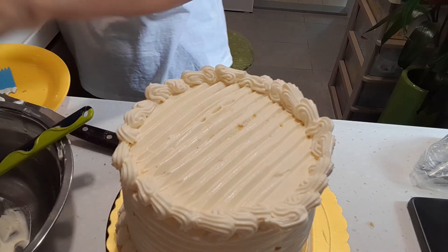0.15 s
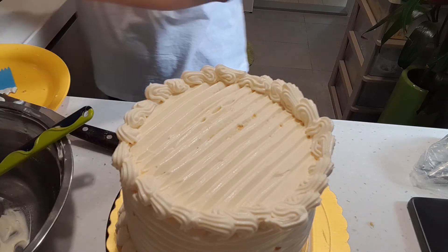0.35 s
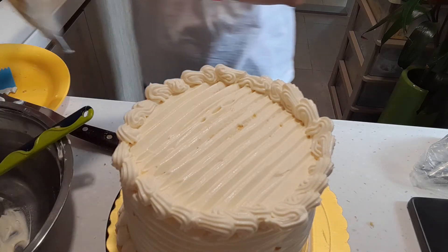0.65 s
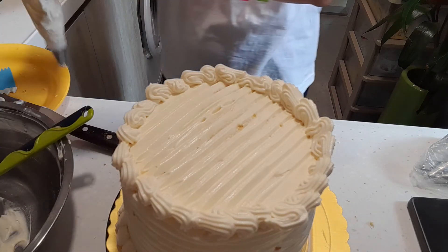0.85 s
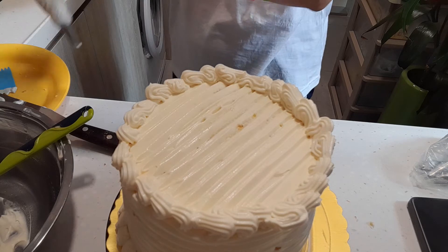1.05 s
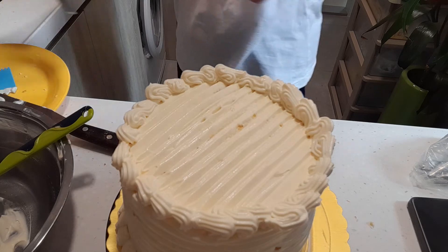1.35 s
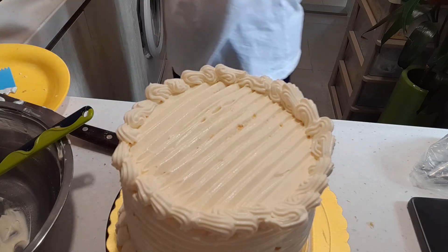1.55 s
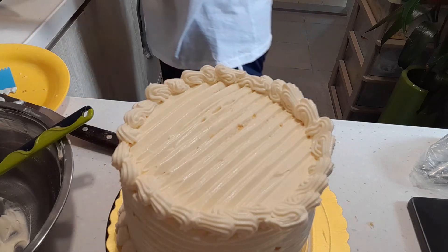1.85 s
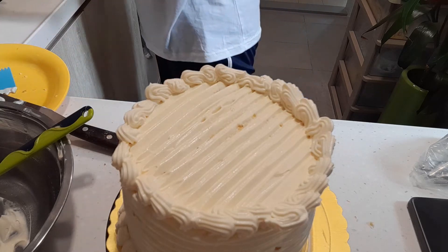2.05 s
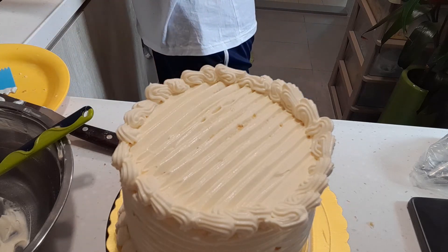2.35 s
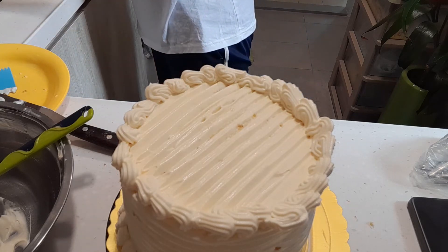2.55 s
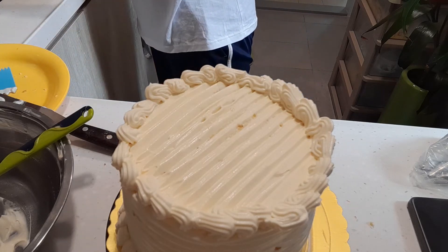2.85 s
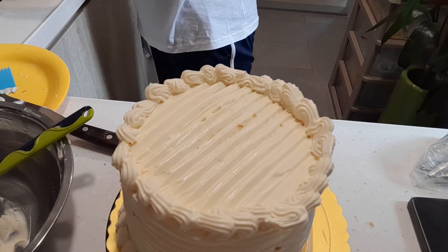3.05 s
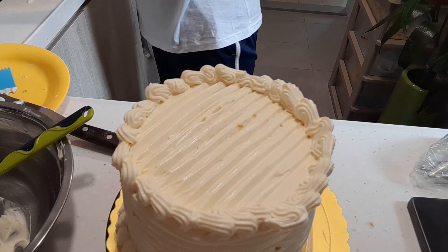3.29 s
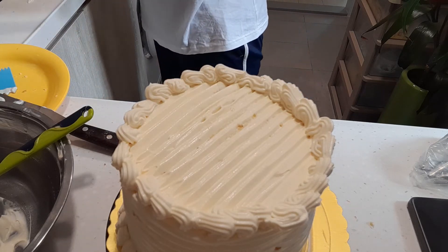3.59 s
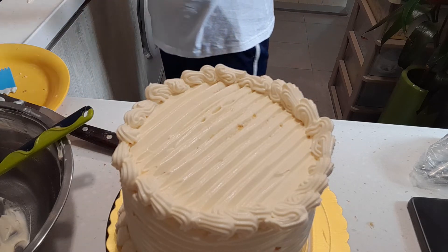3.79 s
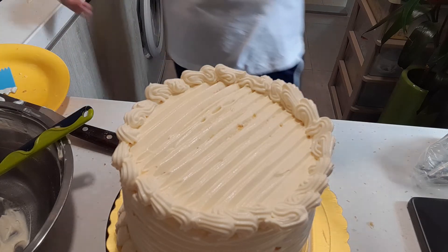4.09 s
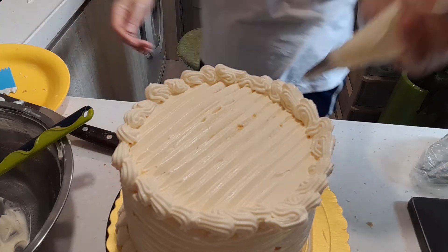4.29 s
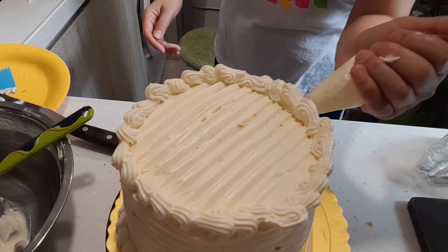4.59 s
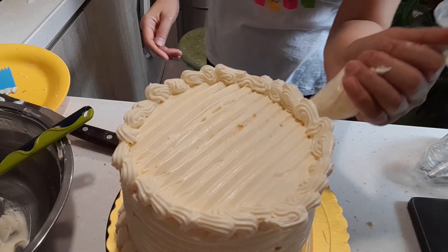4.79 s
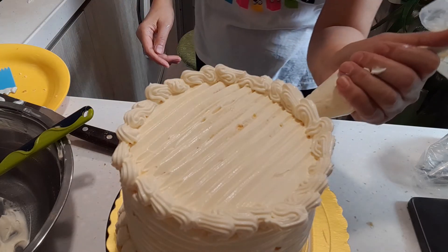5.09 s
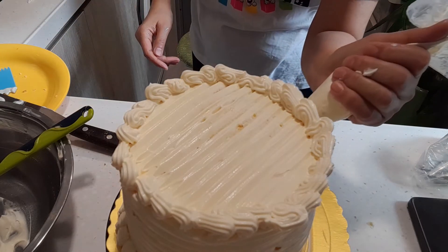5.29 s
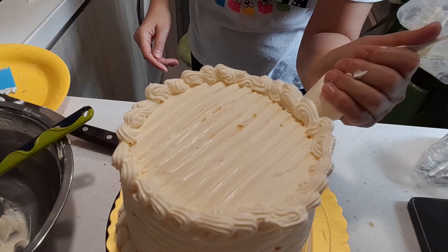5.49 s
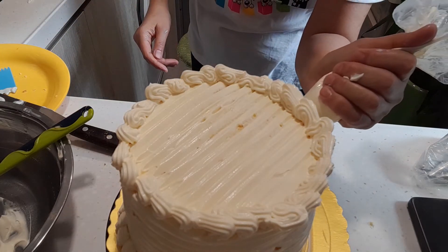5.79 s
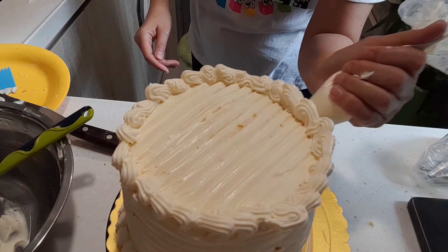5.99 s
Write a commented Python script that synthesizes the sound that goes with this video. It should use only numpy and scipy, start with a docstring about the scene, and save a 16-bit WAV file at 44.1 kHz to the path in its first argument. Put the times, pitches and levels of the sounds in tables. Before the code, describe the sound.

In a small kitchen, a tool clanks once on a metal bowl, thin plastic film crinkles loudly for two seconds, then rustles ever more faintly.

```python
"""In a kitchen a tool knocks on a steel bowl, then a thin plastic bag is twisted, filled and squeezed.
The bag is clumped filtered clicks plus single snaps, each a noise tick with a short ring.
It sounds first to the left, then near the front and last to the right of two spaced microphones.
The knock is a noise crack and a sum of decaying modes; random tap echoes form the room.
A low appliance hum and a faint hiss are diffuse noise."""
import sys
import numpy as np
from scipy import signal
from scipy.io import wavfile
from scipy.ndimage import uniform_filter1d, map_coordinates

SR = 44100
rng = np.random.default_rng(int(sys.argv[2]) if len(sys.argv) > 2 else 0)


def unload_audio(sound):
    """Save the sound as a 16-bit wav file, at the path given as the first command line argument."""
    columns = np.transpose(np.atleast_2d(sound))
    # keep every value between -1 and 1, then stretch to whole-number steps
    steps = np.round(np.clip(columns, -1, 1) * 32767)
    wavfile.write(sys.argv[1], SR, steps.astype(np.int16))


N = 270757

# moves of the hands on the bag: peak t/s, swell/s, hold/s, crackle level/dB before later gains,
# dull crease level/dB above the crackle
GRIPS = [(.17, .05, 0, -59.5, 4.5), (0.252, .005, 0.0029, -34.5, -17), (0.398, 0.11, 0, -29.5, -15),
         (0.549, 0.32, 0.0093, -29.5, -15), (0.659, 0.011, 0, -31.5, -13.5), (0.76, 0.13, 0.0077, -22, -20),
         (0.907, 0.037, 0.049, -37, -17.5), (1.028, 0.18, 0, -28, -25.5), (1.21, 0.067, 0.0019, -28, -28),
         (1.279, 0.029, 0.07, -27, -19), (1.413, 0.16, 0.33, -34, -20.5),
         (1.949, 0.17, 0.023, -33.5, -17.5), (2.101, .03, 0, -33.5, -12), (2.179, .15, 0, -35, -16.5),
         (2.318, 0.12, 0, -27.5, -20), (2.466, 0.45, 0.028, -37.5, -11.5), (2.716, .3, 0.012, -50, -6),
         (2.849, 0.19, 0, -48, -8.5), (2.958, 0.11, 0, -43.5, -15.5), (3.13, 0.089, 0, -41, -9.5),
         (3.176, .1, 0, -52.5, -1), (3.275, 0.13, 0.021, -49.5, 1), (3.377, .1, 0, -55.5, 3.5),
         (3.474, 0.19, 0.022, -45.5, -5), (3.58, .1, .08, -62, -3), (3.768, 0.11, 0.017, -56, -4),
         (3.833, .03, 0.038, -54.5, -3.5), (4.046, 0.037, .03, -59.5, -2.5),
         (4.125, .03, 0.0033, -54, -1.5), (4.229, .08, 0.005, -49, -4), (4.3, .1, 0.18, -60, -2),
         (4.612, 0.15, 0.042, -59.5, -0.5), (4.768, .04, 0.036, -58.5, -6), (4.845, .03, .03, -64, 0),
         (4.93, 0.021, 0, -50.5, -12), (5.01, 0.012, 0, -56, -1), (4.97, .04, 0, -59, 2),
         (5.095, .01, 0, -61.5, -15), (5.129, .02, 0, -62, -11), (5.283, .05, .04, -71.5, 3),
         (5.36, .02, 0, -69, 3), (5.48, .02, 0, -68.5, -16.5), (5.701, 0.049, 0.046, -78.5, 8),
         (5.812, .02, 0.019, -69, -10)]
# direction of the bag: t/s, lead of the left microphone/samples (negative: the right hears it first)
LEFT_LEAD = [(0, 17.5), (3.9, 16), (4.2, -3), (5.4, 3.5), (5.8, -13)]
# spectrum of loose thin film: f/Hz, relative density/dB per Hz
LOOSE_FILM = [(290, -38.5), (500, -4.5), (710, -13.5), (898, -6.5), (1280, -10.5), (2260, -2.5),
              (4970, 0.5), (6960, -2.5), (12100, 4), (14500, 2.5), (15800, -1), (16500, -37)]
# spectrum of film pulled tight over the filling: f/Hz, relative density/dB per Hz
TIGHT_FILM = [(1180, -37.5), (2000, -9), (3340, -0.5), (4550, 0), (6360, -4), (8290, -1.5), (12100, -2),
              (14600, -9), (16500, -58.5)]
FILLED_S = 3.21  # the film is tight from about here
SPACING = 19  # samples of sound travel between the microphones


def gain_of(db):
    """Level definition: decibels to amplitude gain."""
    return 10 ** (np.asarray(db) / 20)


def evened(x):
    """Normalization: scales to rms 1."""
    return x / np.sqrt(np.mean(x ** 2) + 1e-20)


def read(points, hz):
    """Interpolation of a spectrum on a logarithmic frequency axis."""
    f, value = np.transpose(points)
    return np.interp(np.log(hz + 1), np.log(f + 1), value)


def track(rows):
    """Linear interpolation of a time table at every sample."""
    t, value = np.transpose(rows)
    return np.interp(np.arange(N) / SR, t, value)


def coloured(x, points):
    """Minimum-phase filtering: the log spectrum fixes the phase, which makes the filter causal."""
    spectrum_db = read(points, abs(np.fft.fftfreq(4096, 1 / SR)))
    log_gain = np.log(gain_of(np.maximum(spectrum_db, -100)))
    taps = np.fft.ifft(np.exp(np.conj(signal.hilbert(log_gain)))).real[:2048]
    return signal.oaconvolve(np.atleast_2d(x), taps[None], axes=1)[:, :N]


def rustle():
    """Crackling noise: bright film clicks and duller creases of the full part follow the hands."""
    # creases of the full part: f/Hz, relative density/dB per Hz
    crease_spectrum = [(300, -32.5), (600, -6.5), (950, -1), (1500, 1.5), (2400, -4.5), (3500, -14.5),
                       (5500, -40)]
    t = np.arange(N) / SR
    # fades in dB/s, floors in dB for the bag held still
    level_db = handling(fade_db_per_s=159.5, still_db=-90, share_db=0)
    crease_db = handling(fade_db_per_s=135, still_db=-78, share_db=np.transpose(GRIPS)[4])
    # gentle handling clicks more sparsely and in stronger clumps
    busy = np.clip(gain_of(.6 * (level_db + 37.5)), .12, 1)
    clicks = crackle(9000 * busy, spread_db=2.0, clump_db=1.5 + 2.9 * (1 - busy))
    dull_clicks = crackle(1200 + 4000 * busy, spread_db=2.5, clump_db=2.5)

    tight = 1 / (1 + np.exp((FILLED_S - t) / 0.66))
    loose_film = evened(coloured(clicks, LOOSE_FILM)[0])
    tight_film = evened(coloured(clicks, TIGHT_FILM)[0])
    film = (1 - tight) * loose_film + tight * tight_film
    creases = evened(coloured(0.1 * evened(clicks) + evened(dull_clicks), crease_spectrum)[0])
    return gain_of(-4.6 * tight) * (gain_of(level_db) * film + gain_of(crease_db) * creases)


def handling(fade_db_per_s, still_db, share_db):
    """Power summation of the grips: each swells, holds and fades linearly in dB."""
    lifted_s, lifted_fade = 3.3, 1.64  # grips peaking after the filled bag is lifted fade faster
    t = np.arange(N // 32 + 2)[:, None] * 32 / SR
    peak, swell, hold, db = np.transpose(GRIPS)[:4]
    rise_db = np.minimum(22 * (t - peak) / np.maximum(swell, .004), 0)  # 22 dB over the swell
    fade = fade_db_per_s * np.where(peak > lifted_s, lifted_fade, 1)
    fall_db = fade * np.maximum(t - peak - abs(hold), 0)
    power = (gain_of(db + share_db + rise_db - fall_db) ** 2).sum(1)
    level_db = 10 * np.log10(power + gain_of(still_db) ** 2)
    return np.interp(np.arange(N) / SR, t[:, 0], level_db)


def crackle(per_s, spread_db, clump_db):
    """Random impulse process: clicks of uneven size in millisecond clumps, mean power free of rate."""
    clumps = evened(uniform_filter1d(rng.standard_normal(N), size=260))
    size = gain_of(spread_db * np.minimum(rng.exponential(1, N), 4) + clump_db * clumps)
    happens = rng.random(N) < per_s / SR
    return size * rng.standard_normal(N) * happens / np.sqrt(per_s)


def snaps():
    """Buckling: each crease that gives way sends a noise tick of a few milliseconds and a dull ring."""
    # the clearest snaps: t/s, bright tick peak level/dB before panning, ring level/dB above the tick, ring f/Hz
    clear_snaps = [(.166, -37, -5, 1800), (.2493, -27.5, -11, 2280), (.3511, -19, -19, 2280),
                   (.4893, -20, -9, 1560), (.6519, -18, -30, 2320), (.7093, -18, -15, 1720),
                   (1.0056, -18, -14, 840), (1.0136, -12.5, -16, 1090), (1.1194, -27, -25, 1770),
                   (1.1515, -23, -28, 2400), (1.1747, -32, -25, 2360), (1.1987, -20, -4, 2600),
                   (1.2506, -11.5, -21, 2070), (1.2965, -18.5, -5, 2200), (1.3304, -9, -14, 2270),
                   (1.8991, -34, -23, 848), (2.0991, -26, -19, 1910), (2.4379, -26, -17, 2310),
                   (2.7207, -36, -26, 923), (2.7935, -40.5, 3, 990), (2.9208, -38, -20, 890),
                   (2.9387, -32, -23, 900), (3.0754, -44, -9, 958), (3.1018, -36, -9, 1730),
                   (3.1154, -36, -6, 1630), (3.1494, -48, 8, 921), (3.1824, -36.5, 5, 905),
                   (3.2774, -37.5, 7.5, 970), (3.3717, -36, -11, 980), (3.4794, -45, 9, 956),
                   (3.5294, -46, 6, 1100), (3.7893, -40, -4, 921), (3.8417, -35, -5, 2330),
                   (4.0342, -45, -4, 1290), (4.1065, -48.5, 9, 1800), (4.1225, -36, -11, 1000),
                   (4.1630, -51, 8, 1300), (4.1724, -55, 11, 923), (4.1862, -43.5, 8.5, 1740),
                   (4.2308, -30.5, -3.5, 1260), (4.2594, -45, 2, 845), (4.2911, -41, 1, 1560),
                   (4.3364, -45.5, 7, 1070), (4.3504, -50, -3, 1000), (4.3844, -48, 4, 1040),
                   (4.4200, -43.5, -1, 1800), (4.4258, -43, -3, 826), (4.5516, -52, -15, 950),
                   (4.5664, -57, 9, 1370), (4.5774, -56, 5, 900), (4.59, -49, -5, 960),
                   (4.6074, -37, -13, 1030), (4.6184, -43.5, 2, 1400), (4.6554, -52, 7, 1170),
                   (4.7486, -52, 3, 1540), (4.7621, -50, -5, 837), (4.7845, -41, -11, 1360),
                   (4.8254, -45, -6, 890), (4.8494, -53, 8, 1150), (4.9220, -35.5, -9, 830),
                   (4.9744, -47, 0, 1180), (5.01, -37, -11, 840), (5.0274, -46, 4, 1200),
                   (5.0943, -43, -6, 1180), (5.1277, -42.5, -10, 840), (5.2694, -53, -10, 834),
                   (5.3512, -38.5, -4.5, 855), (5.4735, -49, -13, 831), (5.7244, -55, -7, 912),
                   (5.8002, -53, -20, 867), (5.8985, -53.5, -4, 915)]
    out = np.zeros((2, N + 600))
    t = np.arange(600) / SR
    envelope = np.exp(-t / 0.0017) - np.exp(-t / 0.00075)
    rows = clear_snaps + faint_snaps()
    # the nearer microphone hears a snap louder: 0.46 dB per sample of lead
    pan_db = 0.46 * track(LEFT_LEAD)
    for (s, db, ring_db, hz), burst in zip(rows, rng.standard_normal((len(rows), 600))):
        at = round(s * SR)
        tick = coloured(burst * envelope, LOOSE_FILM if s < FILLED_S else TIGHT_FILM)[0, :600]
        sound = tick / abs(tick).max() + gain_of(ring_db) * ring(hz, cycles=1.67)
        side_db = .5 * pan_db[at] * np.array([[1], [-1]])
        out[:, at:at + 600] += gain_of(db + side_db) * sound
    return out[:, :N]


def faint_snaps(count=36):
    """Random scatter: small snaps while the full bag is aimed, in the columns of the clear ones."""
    from_s, to_s = 4.1, 5.1
    when, size, dull, pitch = rng.random((count, 4)).T
    s = from_s + when * (to_s - from_s)
    tick_db = -58.5 + 7 * (2 * size - 1)
    ring_db = -2 + 8 * (2 * dull - 1)
    ring_hz = 1040 * 2 ** (pitch - .5)  # within half an octave either way
    return list(zip(s, tick_db, ring_db, ring_hz))


def ring(hz, cycles):
    """Damped oscillation: a patch of film springs over and dies within a few cycles."""
    turns = np.arange(600) * hz / SR
    return np.sin(2 * np.pi * turns) * np.exp(-turns / cycles) * (1 - np.exp(-turns / 0.24))


def knock():
    """Modal synthesis: a sharp crack, and bowl modes that build up and ring rough as the tool rattles."""
    # modes of the steel bowl: f/Hz, level/dB relative, t60/s
    bowl_modes = [(132, -1.5, .15), (188.8, 0.5, 0.15), (264, -6.5, 0.18), (676.3, -4, 0.086),
                  (1190, -8.5, .13), (1526, -8.5, .1), (1894, 1.5, 0.1), (2110, -7, 0.16), (2360, -3, .12),
                  (3080, -5, 0.08), (3670, -2.5, .12), (4560, -15, 0.077), (5100, -15.5, .1)]
    # spectrum of the crack: f/Hz, relative density/dB per Hz
    crack_spectrum = [(80, -39.5), (130, -5.5), (260, -9), (420, -18.5), (860, -6.5), (2400, -5.5),
                      (3400, -2.5), (4600, -2.5), (5800, -11), (13000, -15), (16500, -48.5)]
    start_s, ring_db, crack_db = .0132, -24.5, -12.5  # levels before the mix
    t = np.maximum(np.arange(SR) / SR - start_s, 0)
    onset = 1 - np.exp(-t / 0.00011)  # zero until the blow
    rattle = uniform_filter1d(rng.standard_normal((len(bowl_modes), 2, SR)), size=300, axis=2)
    bowl = np.zeros(SR)
    for (hz, db, t60), (a, b) in zip(bowl_modes, rattle):
        envelope = gain_of(db - 60 * t / t60) * (1 - np.exp(-t * hz / 0.69))
        roughness = 1 + 0.2 * (evened(a) + 1j * evened(b))
        bowl += envelope * (np.exp(2j * np.pi * hz * t) * roughness).imag
    noise = evened(coloured(rng.standard_normal(SR), crack_spectrum)[0, :SR])
    crack = noise * (np.exp(-t / 0.0026) + 0.252 * np.exp(-t / 0.027))
    return np.pad(onset * (gain_of(ring_db) * bowl + gain_of(crack_db) * crack), (0, N - SR))


def placed(pair):
    """Interaural-style delay and shadowing: the farther microphone hears a little later and duller."""
    n, lead = np.arange(N), track(LEFT_LEAD)
    treble = signal.sosfilt(signal.butter(1, 9000, "high", fs=SR, output="sos"), pair)
    # the recorder's body shades the far microphone from the treble
    shade = np.clip(.4 * np.array([-lead, lead]) / SPACING, 0, 1)
    pair = pair - shade * treble
    left = map_coordinates(pair[0], [n + lead / 2], order=3)
    right = map_coordinates(pair[1], [n - lead / 2], order=3)
    return np.array([left, right])


def kitchen(x, count=16):
    """Time-varying reverberation: the bag keeps moving, so each moment meets other reflections."""
    turn = np.arange(N) / 900  # a new set every 900 samples, crossfaded with the last
    out = np.zeros((2, N))
    for k in range(count):
        share = np.cos(np.pi / 2 * np.clip((turn - k) % count - 1, -1, 1))
        out += signal.oaconvolve((x * share)[None], reflections(), axes=1)[:, :N]
    return out


def reflections():
    """Sparse room response: taps from random directions whose bands decay at their own rates."""
    # decay of the kitchen: f/Hz, t60/s
    decay_times = [(150, 0.39), (1000, 0.33), (3000, 0.32), (8000, 0.26), (15000, 0.05)]
    at = np.arange(100, 20000, 20) + rng.integers(0, 20, 995)
    sign = rng.choice([-1., 1.], 995)
    lead = np.round(rng.uniform(-SPACING, SPACING, 995)).astype(int)
    taps = np.zeros((2, 20100))
    np.add.at(taps[0], at, sign)
    np.add.at(taps[1], at + lead, sign)
    hz, t, z = signal.stft(taps, SR, nperseg=256)
    decay = gain_of(-60 * t / read(decay_times, hz)[:, None])
    counter = 1 + 1.64 * np.exp(-t / 0.013)  # the near counter adds to the first reflections
    tail = signal.istft(z * decay * counter, SR, nperseg=256)[1]
    return tail / np.linalg.norm(tail[0])


def appliance_hum():
    """Diffuse low noise: an appliance hum whose level sinks overall."""
    # spectrum of the hum: f/Hz, relative density/dB per Hz
    hum_spectrum = [(20, -34.5), (42, -29.5), (60, -6.5), (82, -18.5), (100, -9), (126, -2), (150, -4.5),
                    (184, -1), (230, -14.5), (260, -14.5), (320, -14.5), (440, -33), (526, -19.5),
                    (600, -29.5), (900, -29.5), (1500, -45.5), (2500, -66.5)]
    # course of the hum: t/s, level/dB
    hum_level = [(0, -44), (2.44, -43), (2.8, -45), (4.4, -45), (5.2, -47), (6.14, -47)]
    return gain_of(track(hum_level)) * diffuse(hum_spectrum, patchy_db=0.5)


def hiss():
    """Diffuse high noise: a faint, steady hiss with small random level patches."""
    # spectrum of the hiss: f/Hz, relative density/dB per Hz
    hiss_spectrum = [(800, -27.5), (1300, -2), (2000, -10), (2500, -8.5), (5000, -7), (7200, -15.5),
                     (8100, -5.5), (9800, 2), (10600, -16), (12000, -19.5), (14500, -15), (15800, -30.5)]
    return gain_of(-69.5) * diffuse(hiss_spectrum, patchy_db=2.0)


def diffuse(points, patchy_db):
    """Diffuse-field coherence: microphones agree less as waves get shorter than their spacing."""
    frames, hz = N // 1024 + 5, np.fft.rfftfreq(4096, 1 / SR)
    a, b, c, d, patches = rng.standard_normal((frames, 2049, 5)).T
    # level patches in time and frequency
    patches = uniform_filter1d(patches, size=2, axis=1)
    patches = evened(uniform_filter1d(patches, size=8, axis=0))
    same = 0.96 * np.sinc(2 * hz * SPACING / SR)[:, None]
    left = a + 1j * b
    right = same * left + np.sqrt(1 - np.minimum(same ** 2, 1)) * (c + 1j * d)
    z = np.array([left, right]) * gain_of(read(points, hz)[:, None] + patchy_db * patches)
    return evened(signal.istft(z, nperseg=4096, noverlap=3072)[1][:, :N])


def scene():
    """Superposition of direct sound, reflections, hum and faint hiss."""
    bag, creases, blow = rustle(), snaps(), knock()
    # left and right gains/dB of bag and blow
    direct = bag * gain_of([[-2.5], [-4.]]) + creases + blow * gain_of([[3.5], [-.4]])
    # gains/dB into the room
    sent = gain_of(1) * bag + gain_of(-4) * creases.mean(0) + gain_of(-.5) * blow
    return placed(direct) + kitchen(sent) + appliance_hum() + hiss()


def record(dry):
    """Band limiting: the microphones drop the deepest bass, then a low-pass cuts the top."""
    lean = signal.sosfilt(signal.butter(2, 45, "high", fs=SR, output="sos"), dry)
    low_pass = signal.firwin(511, 15900, window=("kaiser", 9), fs=SR)
    return signal.oaconvolve(lean, low_pass[None], "same")


dry = scene()
out = record(dry)
unload_audio(out)
```